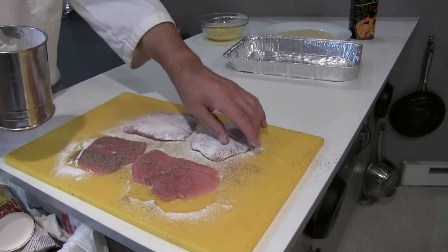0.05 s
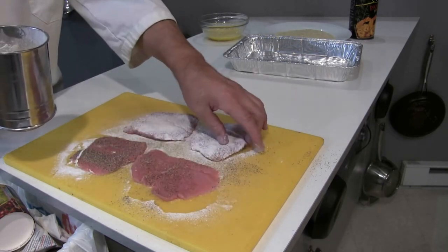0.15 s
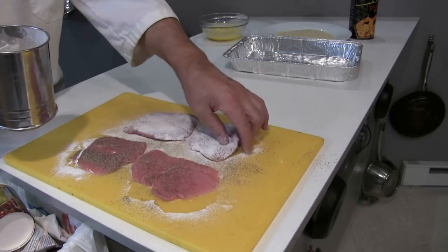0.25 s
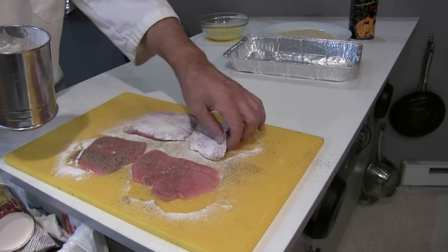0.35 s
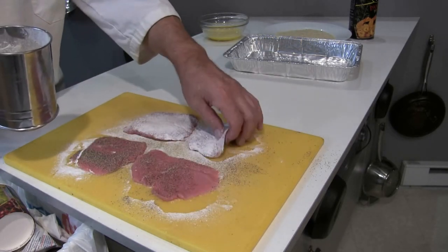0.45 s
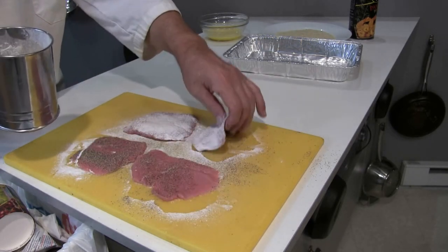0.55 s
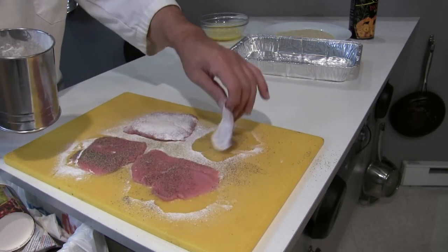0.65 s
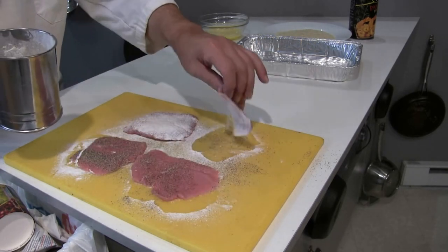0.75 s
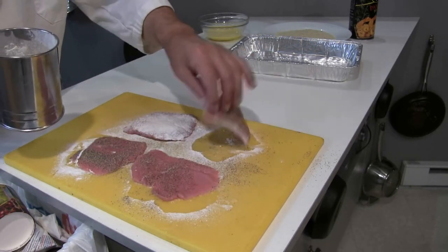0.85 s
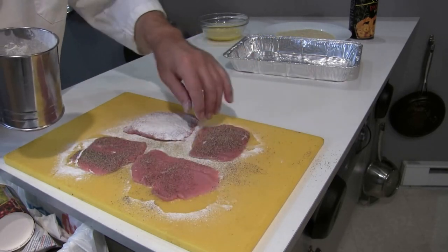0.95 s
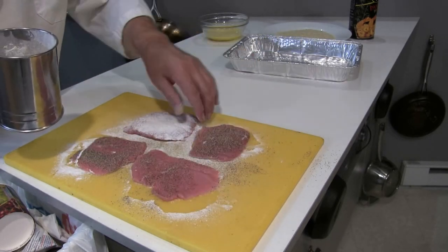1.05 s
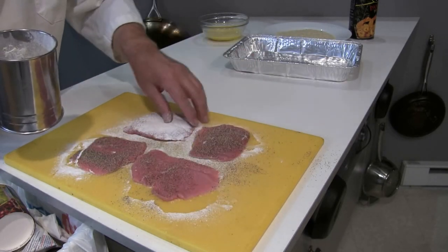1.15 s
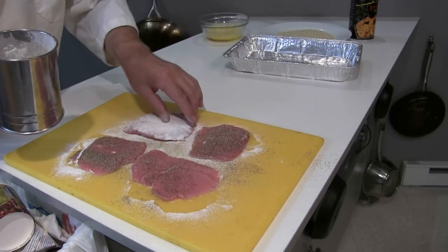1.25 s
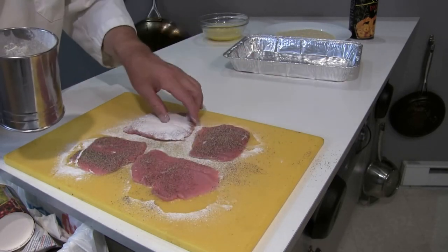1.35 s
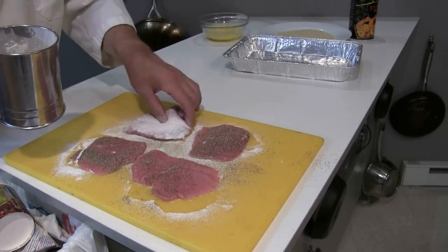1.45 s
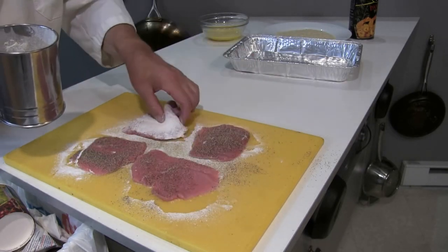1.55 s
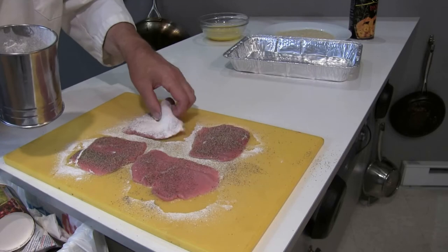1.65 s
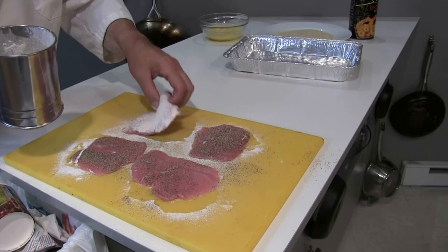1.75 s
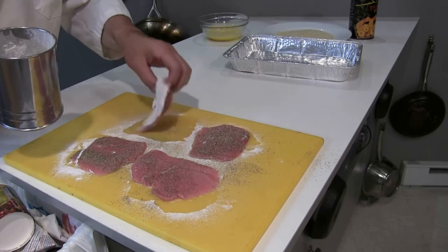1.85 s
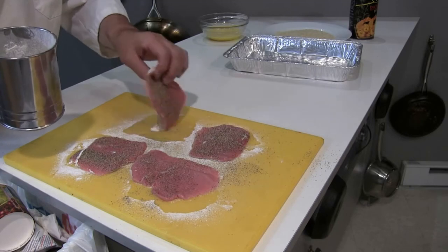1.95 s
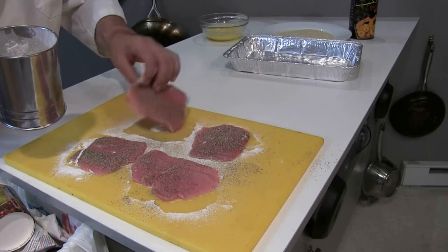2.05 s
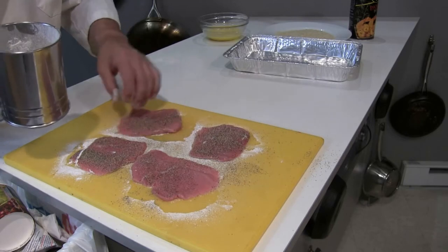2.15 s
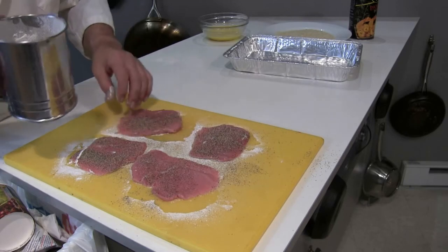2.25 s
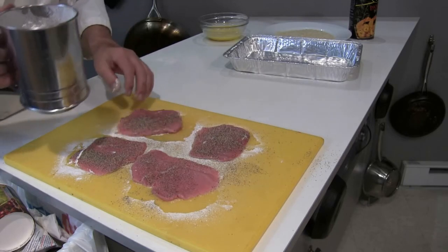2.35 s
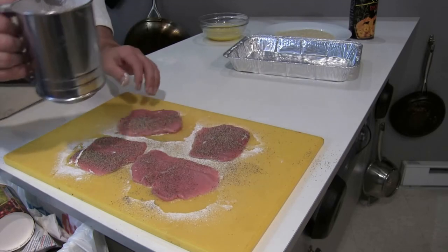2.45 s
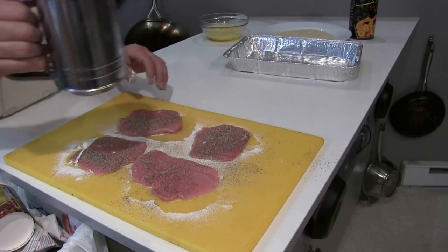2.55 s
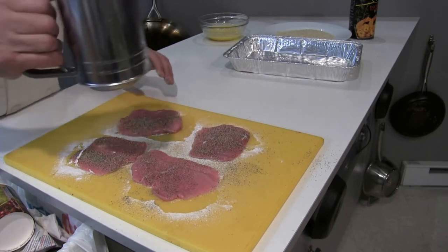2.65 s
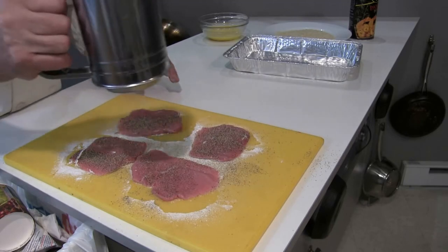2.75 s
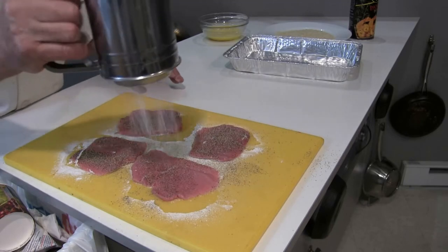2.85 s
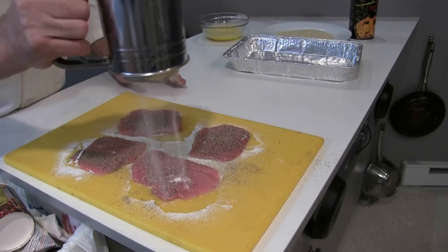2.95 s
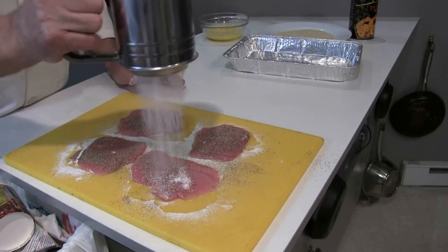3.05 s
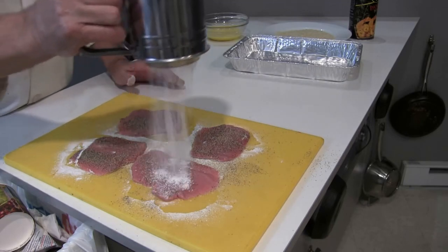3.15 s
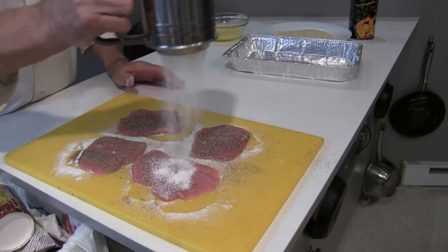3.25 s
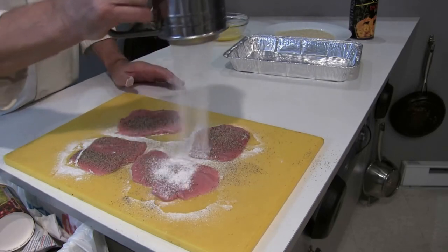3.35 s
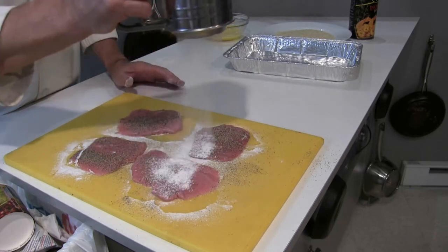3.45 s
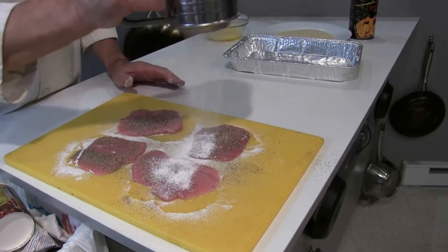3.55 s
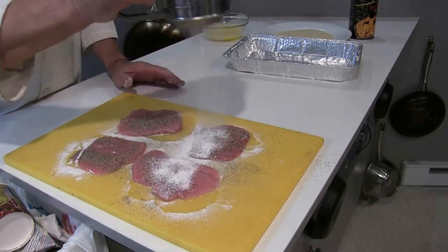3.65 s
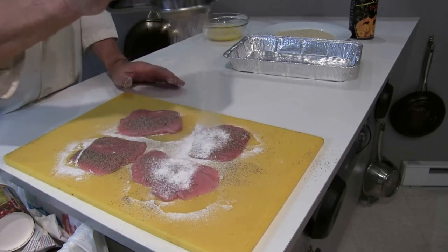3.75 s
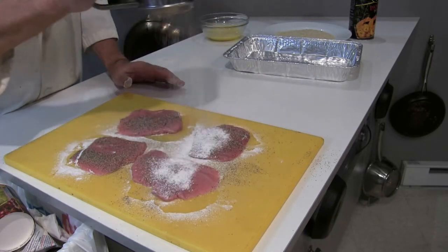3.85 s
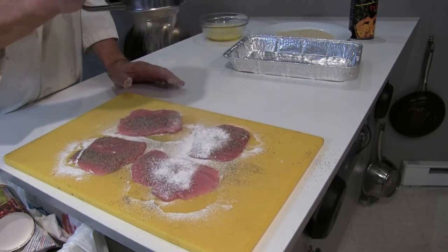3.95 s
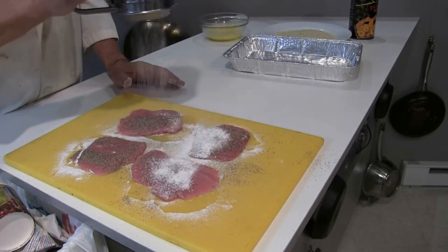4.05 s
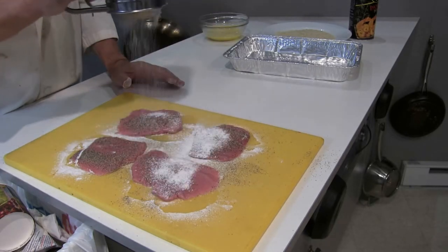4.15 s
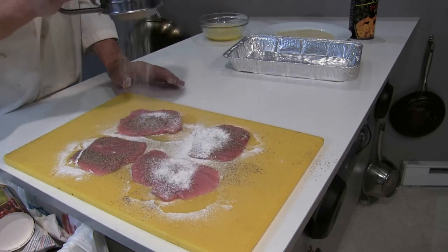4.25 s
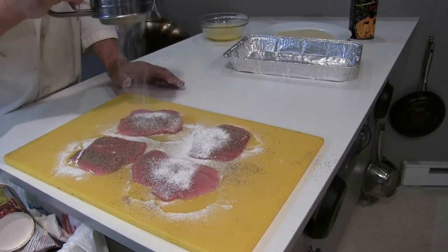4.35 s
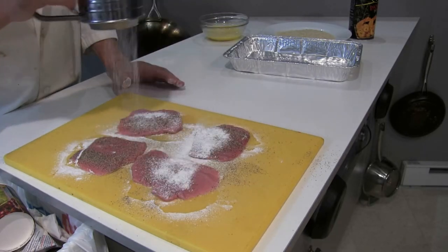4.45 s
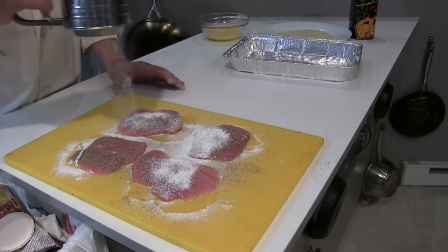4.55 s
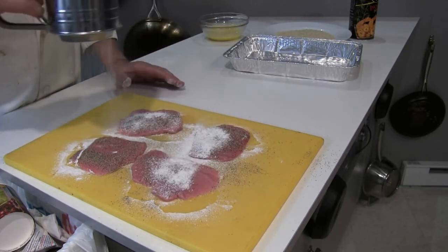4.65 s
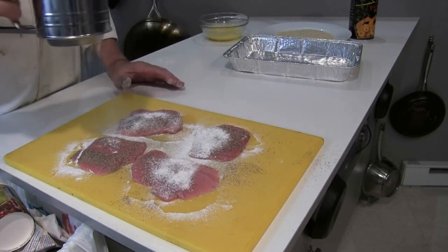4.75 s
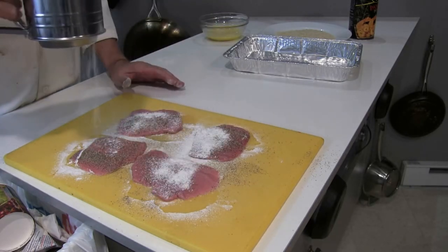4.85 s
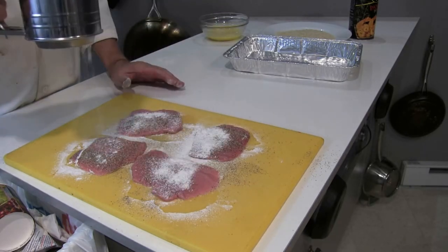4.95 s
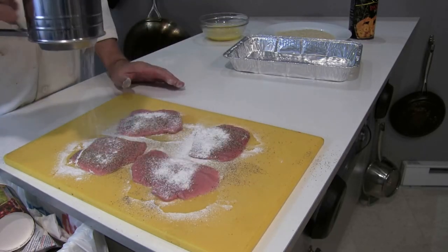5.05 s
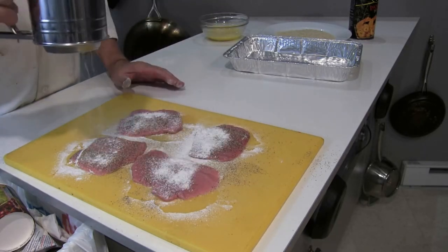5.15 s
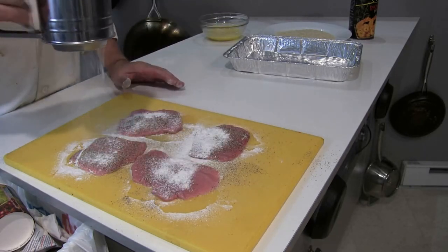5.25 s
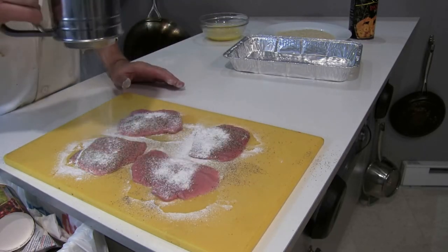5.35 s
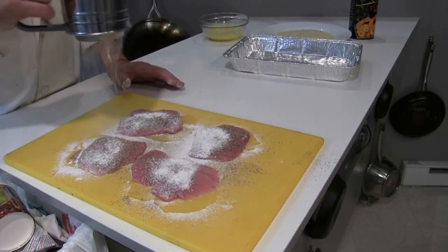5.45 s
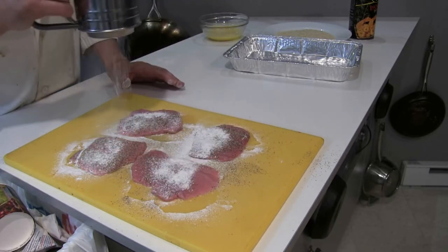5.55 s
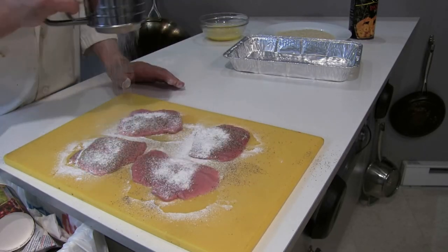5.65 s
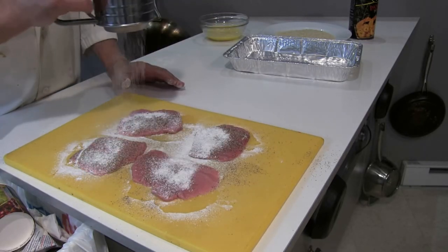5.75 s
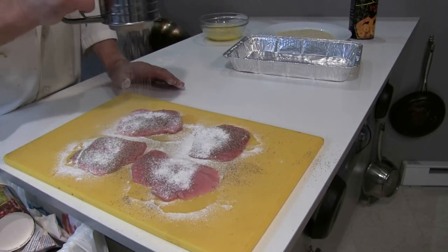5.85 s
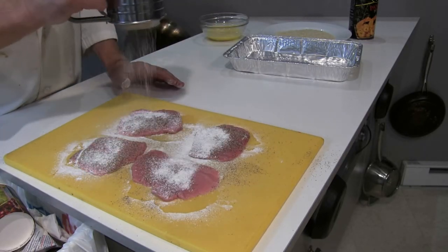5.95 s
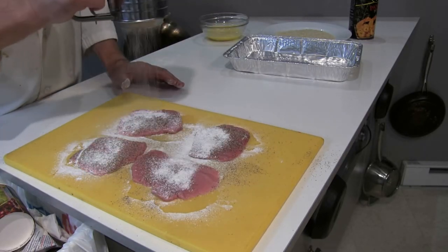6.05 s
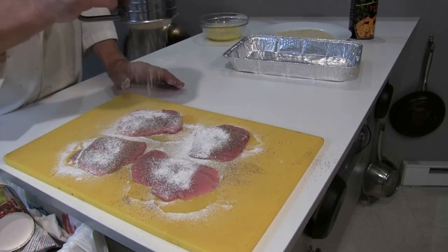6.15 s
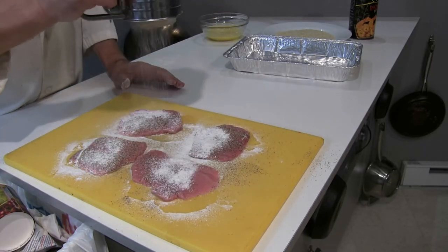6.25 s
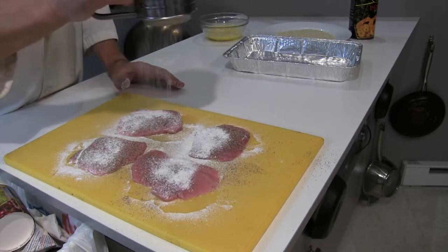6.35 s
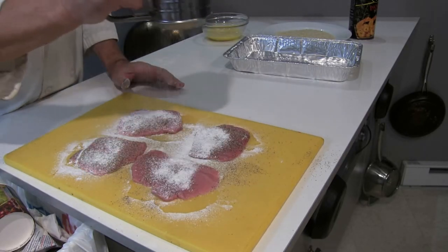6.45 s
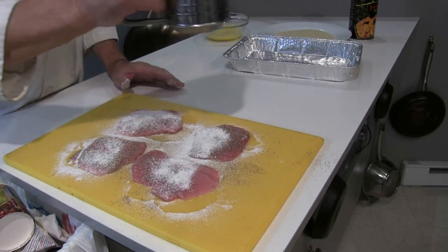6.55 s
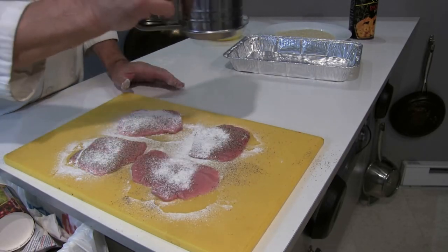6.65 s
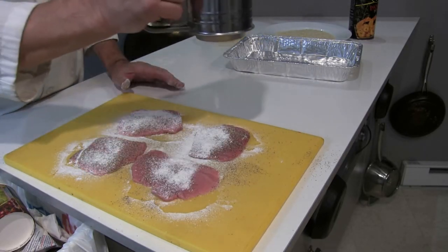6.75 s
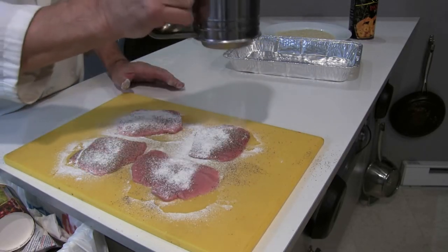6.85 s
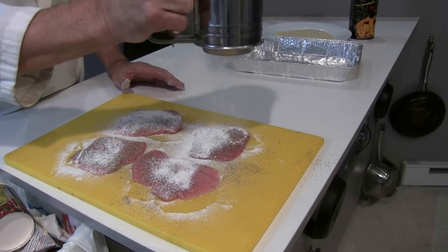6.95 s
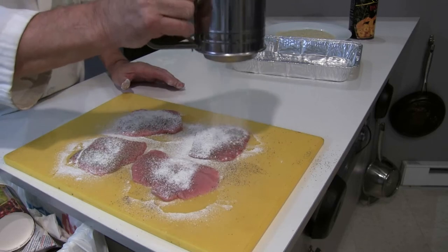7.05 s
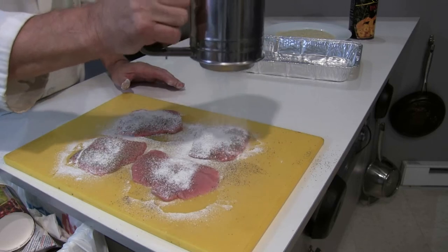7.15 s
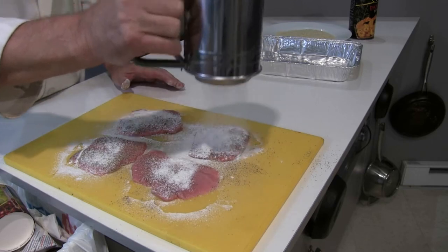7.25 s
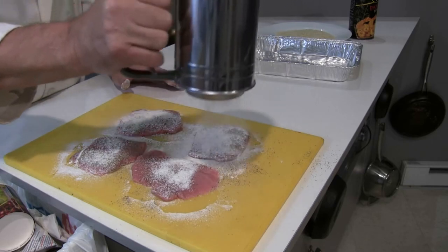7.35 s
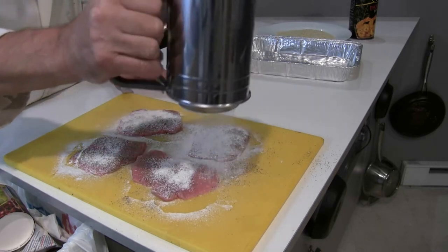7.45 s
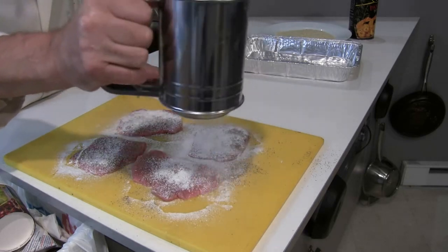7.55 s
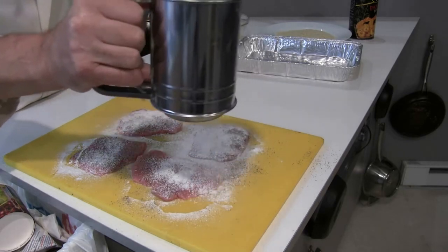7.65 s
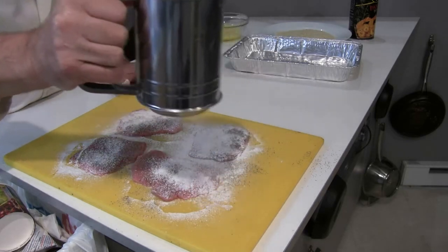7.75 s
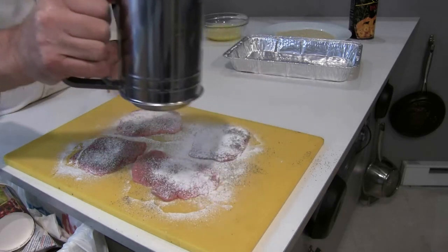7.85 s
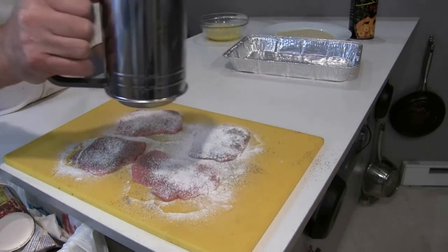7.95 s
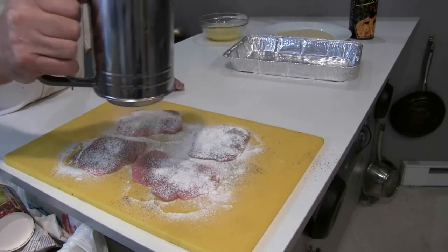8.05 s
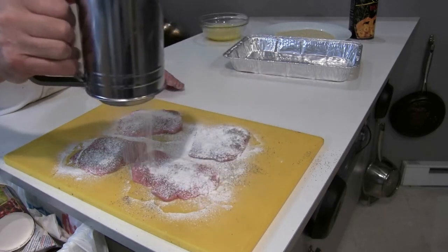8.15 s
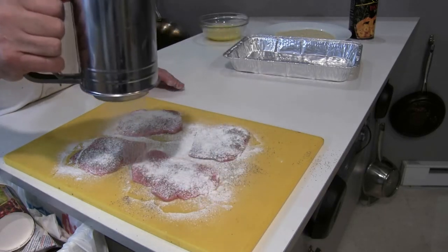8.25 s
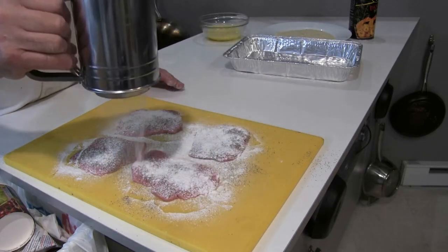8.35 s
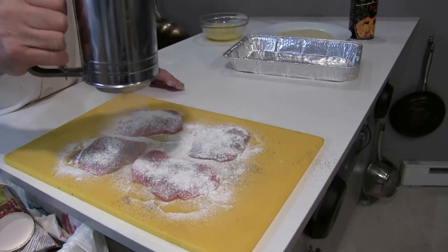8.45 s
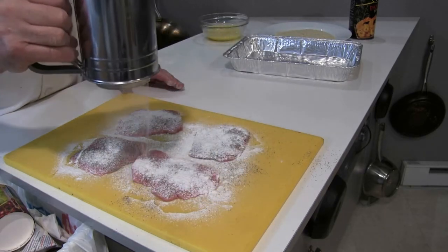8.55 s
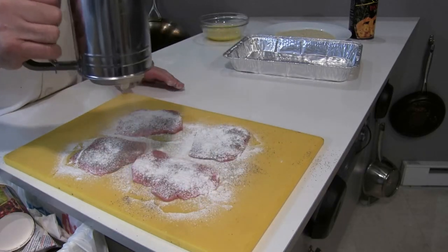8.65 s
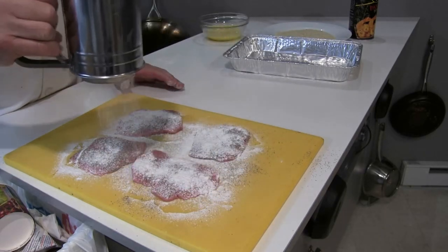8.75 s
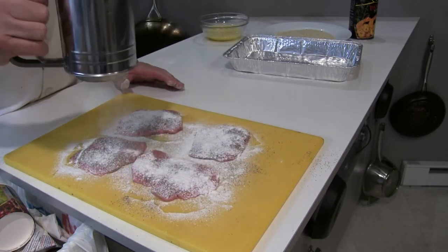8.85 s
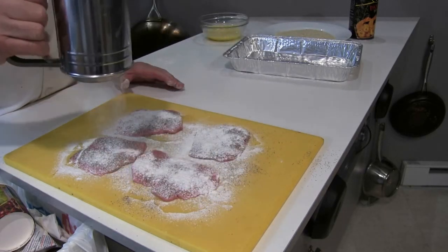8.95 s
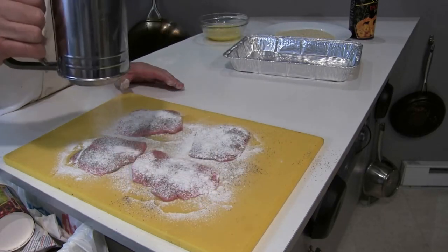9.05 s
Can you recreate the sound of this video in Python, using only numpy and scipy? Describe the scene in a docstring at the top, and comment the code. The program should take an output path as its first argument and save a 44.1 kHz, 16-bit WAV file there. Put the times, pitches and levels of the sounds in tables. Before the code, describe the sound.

Meat cutlets are flipped with muffled pats and a crisp slap, then a squeeze-handle steel sifter clatters and scrapes steadily to the end.

```python
"""Soft slaps over a faint hum come first: cutlets are turned on a floured plastic board, with peeling smacks and a rub.
Then a steel trigger sifter works over them, about 4.5 squeezes a second: nearly every one opens with a tick,
its blades scrape the mesh and it clacks on the stop; the spring throws the trigger back with a second clack.
Slaps, peels, scrape and clacks are noise bursts through resonant filters; the rub and the hum are sines.
A small, hard kitchen adds a short random echo to each event."""
import sys
import numpy as np
from scipy import signal
from scipy.fft import rfft, irfft, next_fast_len
from scipy.io import wavfile
from scipy.ndimage import uniform_filter1d, map_coordinates

SR = 44100
rng = np.random.default_rng(int(sys.argv[2]) if len(sys.argv) > 2 else 0)


def transcribe(u):
    """Save the signal u as a 16-bit wav file named by the first command-line argument.

    u: samples, shape (n,) or (channels, n), limited to [-1, 1]; the rate is SR.
    q: integer samples, one column per channel.
    """
    v = np.clip(np.atleast_2d(u).T, -1, 1)
    q = np.round(v * 32767).astype(np.int16)
    wavfile.write(sys.argv[1], SR, q)


N = 400869

# appliance hum partials: [f/Hz, mean level/dB]
HUM = [(59.2, -70.5), (87, -75), (118.6, -63.5), (231.5, -70), (711, -75), (1420, -80), (4791, -81),
       (6455, -83)]
# colour of the room air: [f/Hz, relative level per Hz/dB]
AIR = [(25, -16), (45, -13), (85, -6), (125, 9.5), (180, 4), (240, 3.5), (400, -0.5), (800, -4.5),
       (1900, -7), (6500, -14), (16000, -24.5)]
# stereo width of the room air: [f/Hz, side against mid/dB]
AIR_WIDTH = [(60, -9), (160, -7), (400, -4.5), (1000, -3), (12000, -1.5)]
# meat and fingers meet the board: [t/s, relative thud level/dB, thud f/Hz, relative smack level/dB, smack f/Hz,
# dry flour brightness/dB, rise/s, t60/s]
PATS = [(0.152, -60, 200, -52.5, 1500, 12, 0.029, 0.16), (0.278, -37, 157, -43.5, 650, -11, 0.018, 0.19),
        (0.417, -51, 233, -43, 1410, 2, 0.024, 0.16), (1.049, -33.5, 151, -46, 560, -27, 0.0025, 0.15),
        (1.321, -63, 200, -52.5, 1500, 13, 0.043, .11), (1.561, -49, 300, -46.5, 1900, -6, 0.031, 0.11),
        (1.615, -46.5, 125, -60, 900, -8, 0.01, 0.087), (1.652, -37.5, 234, -39, 1320, -11, 0.016, 0.099),
        (1.75, -45, 322, -52, 850, 0, 0.025, 0.21), (2.238, -39.5, 242, -41.5, 1200, -13, 0.012, 0.084),
        (2.287, -53, 130, -59, 1000, -8, 0.009, 0.15)]
# board under a thud: [f/Hz, relative level per Hz/dB]
THUD_COLOUR = [(60, -25), (110, -2), (150, 7.5), (200, 2), (300, 7), (430, 1), (600, 1.5), (900, -6),
               (2000, -43.5)]
# wet or floury surface under a smack: [f/Hz, relative level per Hz/dB]
SMACK_COLOUR = [(250, -35), (700, -10), (1100, -6), (1700, -2.5), (3000, -3.5), (6000, -10.5), (10000, -21),
                (16000, -31)]
# sticky skin peels off the board: [t/s, relative level/dB]
PEELS = [(0.245, -42), (0.259, -35), (0.398, -44), (0.421, -45), (1.6425, -45), (1.719, -46)]
# a damp cutlet drags on the board: [t/s, mean slip rate f/Hz, relative level/dB]
DRAG = [(1.465, 335, -66), (1.48, 335, -49), (1.505, 305, -41), (1.53, 320, -44), (1.548, 320, -50),
        (1.565, 320, -38.5), (1.588, 310, -52), (1.612, 235, -46), (1.66, 245, -39), (1.7, 260, -52),
        (1.715, 340, -64), (1.75, 395, -46), (1.8, 380, -47), (1.83, 380, -70)]
# the trigger is pressed home: [t/s, relative level/dB, share of the first snap/0-1, ping f/Hz, ping lift/dB,
# body lift/dB, rim lift/dB, treble lift/dB]
PRESSES = [(2.736, -29.5, 1, 7960, 13, -12, -11, -3), (2.934, -27, 0.14, 3140, 10, 0, -3, -2),
           (3.179, -25.5, 0.32, 7000, 13, -0.5, -2, -7), (3.409, -28, 0.34, 5100, 7, 0, -4, -3),
           (3.65, -29.5, 1, 3600, 7, 2.5, 2.5, 6), (3.886, -30, 0.3, 1990, 6, -2.5, -2, 1.5),
           (4.11, -34.5, 1, 2240, 12, 3, -1, -4), (4.311, -30, 0.73, 2060, 5, 0.5, -4, 0),
           (4.506, -30, 0.73, 3430, 7.5, 1.5, -2, -1), (4.729, -30, 0.98, 3440, 9, -3, -2, 3.5),
           (4.949, -31, 0.45, 2230, 5, -7, 1, 0), (5.157, -29, 0.64, 5120, 0, 3, 1, -3),
           (5.361, -30, 0.3, 3770, 3, 1.5, -6, -1), (5.588, -30, 0.24, 3340, -5, -2.5, -0.5, 1.5),
           (5.804, -28, 0.68, 1840, 9, -2, -1, 1.5), (6.018, -27, 0.7, 1790, 7, -2, -1.5, -2),
           (6.216, -25, 0.44, 4210, 3, -2.5, 0, -0.5), (6.429, -28, 1, 1990, 7, -4, -4, -2),
           (6.653, -26.5, 0.95, 4070, 6, 3, -1, 1.5), (6.874, -29, 0, 2360, 4, 2, 0, 1),
           (7.101, -29, 0.03, 2480, 8, 6, 0.5, -1), (7.318, -28.5, 0.2, 2240, 8, -0.5, -2, -1),
           (7.545, -23.5, 0.84, 3600, 1, 1, 1, 1), (7.763, -29, 1, 6080, 2, 0, -6, 2.5),
           (7.973, -26, 0.68, 5660, 2, -4, -1, -1), (8.203, -30, 0.43, 3970, 11, -2, -9, 1.5),
           (8.424, -26.5, 0.74, 4520, 8, -2.5, 0.5, 0), (8.641, -30.5, 1, 1740, 9, 1.5, -3, -2),
           (8.852, -26, 0.5, 5730, 5, 0.5, -3.5, -3), (9.063, -27.5, 0.2, 4540, 8, -1.5, -4, -6)]
# the spring throws the trigger back: [t/s, relative level/dB, share of the first snap/0-1, ping f/Hz, ping lift/dB,
# body lift/dB, rim lift/dB, treble lift/dB]
RELEASES = [(2.744, -28, 0.82, 3060, 7, 2.5, 1.5, 1.5), (3.01, -24.5, 0.34, 5950, 9, 0, 4.5, -1),
            (3.248, -26, 0.57, 6810, 3, 0, -1.5, 1), (3.476, -25.5, 0.98, 3630, 0, 0, -3.5, -1.5),
            (3.714, -30.5, 0.36, 6840, 9, 3, -2, 0.5), (3.941, -32.5, 0.22, 8740, 13, 2, -3, 5.5),
            (4.154, -29, 0.9, 4110, 1, -1, -6.5, 6), (4.356, -29, 0.3, 7130, 5, 0, -0.5, 7),
            (4.577, -35, 0.64, 2370, 11, 1, -8, 9.5), (4.789, -31, 0.3, 3620, 6, -0.5, -4, 5),
            (5.002, -27.5, 0.15, 2520, 11, 2.5, 1.5, 4.5), (5.214, -29.5, 0.6, 2350, -2, 5.5, 2.5, 2.5),
            (5.43, -27.5, 0.47, 3870, -2, -4.5, -2, 3), (5.651, -30, 0.1, 3620, 4, 0, -1.5, 4),
            (5.87, -27.5, 0.97, 7940, 1, -0.5, -4, 1), (6.075, -27, 0.94, 2160, 5, 1.5, -0.5, 0.5),
            (6.282, -29.5, 0.97, 5700, 4, -1.5, -1, 3.5), (6.497, -28.5, 0.44, 2330, 10.5, 4, -2, 2),
            (6.731, -24.5, 0.93, 2580, -3.5, 1.5, -1, 2), (6.953, -23, 0.51, 3670, 4, 0.5, -1, 1.5),
            (7.162, -26, 0.95, 5760, 3, 1, 0, 6.5), (7.385, -24, 0.95, 5730, 1, 1, -1.5, 4.5),
            (7.607, -25.5, 0.94, 6820, 10.5, 3, -1, 2), (7.81, -28, 0.92, 7350, 2, 3, -1, 7.5),
            (8.044, -23.5, 0.88, 6700, 7.5, 2.5, -3.5, 1), (8.267, -28, 0.6, 6870, 9, 0.5, -3, -1.5),
            (8.49, -26.5, 0.93, 6600, 5.5, 4, -3, -0.5), (8.697, -27, 0.68, 3250, 7, 2, -1, 2.5),
            (8.908, -24, 0.25, 6660, 10, 0, -2.5, -0.5)]
# extra clacks and rebounds, during the strokes and just after the stops: [t/s, relative level/dB, share of the
# first snap/0-1]
EXTRA_CLACKS = [(2.772, -33, 0.4), (2.79, -36, .4), (2.968, -29, 0.54), (3.034, -28.5, 0.4),
                (3.207, -32, 0.6), (3.435, -31, 0.9), (3.622, -31, 0.2), (3.747, -36, 0.3),
                (4.585, -33, 0.95), (6.412, -39, 0.5), (6.642, -37, 0.9), (6.905, -28, 0.74),
                (7.133, -38, 0.87), (7.169, -25.5, 0.7), (7.352, -31, 1), (8.038, -32, .9),
                (8.221, -32.5, 0.45), (8.668, -57, 0.9), (8.69, -29, 0.14)]
# colour of one steel contact: [f/Hz, relative level per Hz/dB]
CLACK_COLOUR = [(60, -27.5), (130, -16.5), (250, -12.5), (500, -3.5), (800, 1), (1080, -3), (2000, -1),
                (3200, -2.5), (6000, -4.5), (8300, -9), (11000, -12.5), (15000, -20.5), (16000, -44)]
# mean resonances of the steel can and spring: [f/Hz, width/Hz, lift/dB]
CAN = [(232.8, 12, 9), (379, 15.5, 4), (404, 23, 4), (509.6, 20, 3), (718.6, 23, 4.5), (773.5, 22, 6),
       (841, 36, 7), (953, 31, 2), (1355, 28, 1.5), (1386, 440, 5), (1664, 42, 1), (2510, 640, 1),
       (3630, 400, 3), (5660, 140, 1), (9260, 390, 0.5)]
# the linkage takes up its slack and the stroke begins: [t/s, relative level/dB]
TICKS = [(2.891, -45.5), (3.15, -38.5), (3.392, -42), (3.586, -45), (3.836, -49), (4.06, -54), (4.264, -45),
         (4.461, -44.5), (4.689, -43), (4.903, -44), (5.11, -47), (5.318, -45), (5.546, -46), (5.761, -46),
         (5.973, -45), (6.171, -46), (6.391, -46), (6.611, -41), (6.837, -42.5), (7.058, -43.5),
         (7.277, -43), (7.497, -44), (7.716, -42.5), (7.923, -42), (8.155, -44), (8.377, -40.5),
         (8.597, -52), (8.802, -47), (9.023, -46)]
# blades on the mesh over time: [t/s, relative level/dB]
SCRAPE = [(2.85, -49), (2.92, -35), (3.11, -31), (4.03, -36), (4.38, -36.5), (6.1, -32), (7.11, -33.5),
          (7.44, -33), (9.09, -32)]
# colour of the mesh: [f/Hz, relative level per Hz/dB]
MESH_COLOUR = [(100, -33), (300, 1.5), (800, -5), (1100, 0.5), (2500, -0.5), (6500, -0.5), (10000, -5.5),
               (15000, -12.5)]
# where the sifter is held: [t/s, left against right/dB]
PAN = [(2.7, 0.5), (3.27, -0.5), (4.17, -0.5), (4.83, 0.5), (7.01, -1), (9.09, 0.5)]
# the sifter comes nearer or moves off: [t/s, direct level of press and release clacks/dB]
DIRECT = [(2.7, -5.5), (5, -0.5), (6.9, -5), (7.6, 0), (8.1, -0.5), (9, -2.5)]
# full-length decay of the kitchen: [f/Hz, t60/s]
KITCHEN = [(150, 0.17), (800, 0.41), (3000, 0.3), (7000, 0.33), (14000, 0.29)]
# lift of the first strong echo over the others: [f/Hz, added gain]
CEILING = [(200, 1.8), (780, 0.98), (1200, 0.35), (10000, 0.31)]
# stereo width of the echoes: [f/Hz, side against mid/dB]
ECHO_WIDTH = [(130, -13), (260, -10.5), (500, -9.8), (1500, -7.8), (7000, -8), (13000, -4.8)]

SIZE = 16384  # samples in a filter design
HZ = np.fft.rfftfreq(SIZE, 1 / SR)
TIME = np.arange(N) / SR
TOP_HZ = 15900  # upper band limit
CEILING_S = 0.013  # delay of the first strong echo
HUM_WAVER_DB = 1.6
SLAP_S, SLAP_DB = 1.045, -20.5  # a cutlet lands flat, with a crisp edge
DRAG_ROUGH = 0.025  # unevenness of the slip rate, as a fraction
CAN_DETUNE, CAN_SCATTER_DB = 0.012, 1.2  # grip and flour shift each resonance a little from blow to blow
GRAZE_S, GRAZE_RISE_S = 0.012, 0.0016  # a blade's graze before it lands: lead, swelling time
PING_WIDTH = 0.2  # a ping is brief: its bandwidth over its pitch
PING_SCATTER_OCTAVES = 0.25  # each tick of the linkage pings at a new pitch
SECOND_TICK_S, SECOND_TICK_DB = 0.022, -49.5  # the blades break loose just after the tick: delay, relative level
SWEEP_S = 0.035  # how long the blades run fast on either side of a stop
SPIN_UP_S = 0.01  # the blades gather speed after the tick
RASPS_PER_S, RASP_DB = 70, 9  # a blade snags on a mesh wire: mean rate, mean kick over the grating
RASP_S = 0.0012  # decay time of one snag


def amp(db):
    """Decibels to gain."""
    return 10 ** (np.asarray(db) / 20)


def unit(x):
    """Scale to rms 1."""
    return x / np.sqrt(np.mean(x ** 2) + 1e-20)


def blow(x):
    """Scale to energy 1."""
    return x / (np.linalg.norm(x) + 1e-12)


def along(points, hz):
    """Read (Hz, value) points on a log frequency axis."""
    f, v = np.transpose(points)
    return np.interp(np.log(hz + 1), np.log(f), v)


def wobble(rate, count=N):
    """A smooth random curve, rate knots a second."""
    knots = rng.standard_normal(int(count * rate / SR) + 4)
    return map_coordinates(knots, [np.arange(count) * rate / SR], order=2)


def filtered(x, gain):
    """Shape x by a gain that depends on frequency."""
    count = x.shape[-1]
    m = next_fast_len(count + 8192)
    return irfft(rfft(x, m) * gain(np.fft.rfftfreq(m, 1 / SR)), m)[..., :count]


def ring(db):
    """Causal (minimum-phase) impulse response with the given gain on HZ."""
    cepstrum = irfft(np.log(amp(db)))
    cepstrum[1:SIZE // 2] *= 2
    cepstrum[SIZE // 2 + 1:] = 0
    return irfft(np.exp(rfft(cepstrum)))[:SIZE // 4]


def bump(hz, width):
    """A resonance curve of height 1 on HZ."""
    return 1 / (1 + (2 * (HZ - hz) / width) ** 2)


def grains(count, rate):
    """Tiny random contacts, rate a second, with rms 1."""
    return unit(rng.standard_normal(count) * (rng.random(count) < rate / SR))


def even(x, size=12):
    """Flatten the broad colour of a burst of contacts and keep its timing."""
    z = rfft(x)
    power = uniform_filter1d(abs(z) ** 2, size)
    return irfft(z / np.sqrt(abs(power) + 1e-12), len(x))


def add(track, s, sound):
    """Mix a stereo sound into the track at time s."""
    start = max(round(s * SR), 0)
    part = track[:, start:start + sound.shape[1]]
    part += sound[:, :part.shape[1]]


def spread(pair, width):
    """Two unrelated signals become mid and side of a diffuse stereo field."""
    side = filtered(pair[1], lambda hz: amp(along(width, hz)))
    return np.array([pair[0] + side, pair[0] - side])


def panned(x, db):
    """Left louder than right by db."""
    return x * amp(np.array([[0.5], [-0.5]]) * db)


def in_kitchen(x, wet_db, length=1, build=0.00053, direct_db=0):
    """Direct sound, then worktop and walls: decaying noise, drawn afresh for each sound."""
    hz, t, z = signal.stft(rng.standard_normal((2, SR // 3)), SR, nperseg=256)
    first_echo = along(CEILING, hz)[:, None] * np.exp(-((t - CEILING_S) / 0.0037) ** 2)
    decay = amp(-60 * t / (length * along(KITCHEN, hz))[:, None])
    tail = signal.istft(z * (1 + first_echo) * decay, SR, nperseg=256)[1]
    tail *= 1 - np.exp(-(np.arange(tail.shape[1]) / SR / build) ** 2)
    tail = np.array([blow(even(part, size=36)[:3 * SR // 10]) for part in tail])
    echo = amp(wet_db) * spread(tail, ECHO_WIDTH)
    echo[:, 0] += amp(direct_db)  # the direct sound
    return signal.fftconvolve(x[None], echo, axes=1)


def background(air_db=-53.5):
    """Room air is coloured noise; the appliance hum is sines that waver in level and phase."""
    noise = filtered(rng.standard_normal((2, N)), lambda hz: amp(along(AIR, hz)))
    air = unit(spread(noise, AIR_WIDTH))
    hum = 0
    for hz, db in HUM:
        level = np.sqrt(2) * amp(db + HUM_WAVER_DB * wobble(rate=4.1))
        hum = hum + level * np.sin(2 * np.pi * hz * TIME + 0.5 * wobble(rate=17))
    return amp(air_db) * air + hum


def cutlets(lead=0.093, boom_db=8, boom_width=0.16, cup_db=7, cup_width=1.0):
    """Soft meat presses onto the board: low thuds, surface smacks coloured by dry flour, one flat slap."""
    out, t = np.zeros((2, N)), np.arange(SR // 3) / SR - lead
    floury = along([(1500, 0.066), (4500, 0.9)], HZ)
    for s, thud_db, thud_hz, smack_db, smack_hz, bright_db, rise, t60 in PATS:
        press = np.where(t < 0, np.exp(-abs(t) / rise), amp(-60 * abs(t) / t60))
        # each spot of the board booms at its own pitch
        board = ring(along(THUD_COLOUR, HZ) + boom_db * bump(thud_hz, boom_width * thud_hz))
        thud = signal.fftconvolve(even(press * grains(len(t), rate=6000), size=24), board)
        cup = cup_db * bump(smack_hz, cup_width * smack_hz)
        surface = ring(along(SMACK_COLOUR, HZ) + bright_db * floury + cup)
        smack = signal.fftconvolve(press * grains(len(t), rate=2600), surface)
        # a longer press carries more energy
        sound = np.linalg.norm(press) * (amp(thud_db) * blow(thud) + amp(smack_db) * blow(smack))
        add(out, s - lead, in_kitchen(sound, wet_db=-2.0))
    slap = amp(SLAP_DB) * blow(ring(along(SMACK_COLOUR, HZ)))
    add(out, SLAP_S, in_kitchen(slap, wet_db=0))
    return out


def peels(gain_db=15, t60=0.015, bright_db=9):
    """Sticky skin lets go of the board in crisp crackles: short decaying bursts of tiny contacts."""
    out, t = np.zeros((2, N)), np.arange(SR // 30) / SR
    skin = ring(along(SMACK_COLOUR, HZ) + bright_db * along([(1500, 0.19), (4500, 0.81)], HZ))
    for s, db in PEELS:
        burst = even(grains(len(t), rate=3100) * amp(-60 * t / t60))
        crackle = signal.fftconvolve(burst, skin)
        add(out, s, in_kitchen(amp(db + gain_db) * blow(crackle), wet_db=-4))
    return out


def drag(unsteady_db=3, gain_db=-2.5):
    """Stick and slip on the plastic make a short, low, uneven rubbing tone."""
    s, hz, db = np.transpose(DRAG)
    t = np.arange(s[0], s[-1], 1 / SR)
    slip_hz = np.interp(t, s, hz) * (1 + DRAG_ROUGH * wobble(rate=130, count=len(t)))
    phase = 2 * np.pi * np.cumsum(slip_hz) / SR
    slips = np.sin(phase) + amp(-14) * np.sin(phase / 2) + amp(-24) * np.sin(3 * phase)
    grip_db = np.interp(t, s, db) + gain_db + unsteady_db * wobble(rate=130, count=len(t))
    out = np.zeros((2, N))
    add(out, s[0], in_kitchen(amp(grip_db) * slips, wet_db=-7))
    return out


def can_db():
    """The resonances of the can for one blow, slightly scattered, in dB on HZ."""
    total = 0
    for hz, width, db in CAN:
        lift = db + CAN_SCATTER_DB * rng.standard_normal()
        total = total + lift * bump(hz * (1 + CAN_DETUNE * rng.standard_normal()), width)
    return total


def spot():
    """The blades touch a new spot each time, which favours other modes: a random curve on HZ."""
    return np.interp(np.sqrt(HZ / HZ[-1]), np.linspace(0, 1, num=120), rng.standard_normal(120))


def contacts(share, ping_hz, ping_db, lead, soft_rise=0.0041, chatter_time=0.0069, chatter_rate=3400,
             graze_db=-15, snap_t60=0.01):
    """A blade grazes its stop and snaps home with a short ping; the remaining energy is chatter."""
    t = np.arange(SR // 14) / SR - lead
    after = np.maximum(t, 0)
    graze = blow(grains(len(t), rate=3900) * (t < 0) * np.exp(-abs(t) / GRAZE_RISE_S))
    # a square hit snaps at once, a glancing one takes longer
    rise = soft_rise * (1 - share) ** 3 + 1 / SR
    envelope = amp(-60 * after / snap_t60) * (1 - np.exp(-after / rise))
    snap = even(rng.standard_normal(len(t)) * envelope) * (t >= 0)
    ping = ring(ping_db * bump(ping_hz, PING_WIDTH * ping_hz) + along([(6000, 0.5), (14000, 3)], HZ))
    snap = blow(signal.fftconvolve(snap, ping)[:len(t)])
    # the chatter comes in small rebounds, a few ms apart
    rebounds = amp(3.5 * wobble(rate=420, count=len(t)))
    chatter = grains(len(t), chatter_rate) * rebounds * after * np.exp(-after / chatter_time)
    chatter = blow(even(chatter, size=16))
    return np.sqrt(share) * (snap + amp(graze_db) * graze) + np.sqrt(1 - share) * chatter


def clack(db, snap, ping_hz, ping_db, body_db, rim_db, treble_db, spot_db=1.0, gain_db=29):
    """One steel contact rings the can; it begins GRAZE_S before the blow."""
    body = along([(420, 0), (700, 1), (870, 1), (1080, 0)], HZ)
    rim = along([(950, 0), (1200, 1), (1600, 1), (2200, 0)], HZ)
    treble = along([(4500, 0), (9500, 1)], HZ)
    strike = contacts(np.clip(snap, 0, 1), ping_hz, ping_db, GRAZE_S)
    can = ring(along(CLACK_COLOUR, HZ) + can_db() + spot_db * spot())
    hit = blow(signal.fftconvolve(strike, can))
    tone_db = db + gain_db + body_db * body + rim_db * rim + treble_db * treble
    return irfft(rfft(hit, SIZE) * amp(tone_db))[:len(hit)]


def clacks():
    """The pressed trigger damps the steel, so its echo is short; let go, it lands fuller and rings on."""
    out = np.zeros((2, N))
    near = lambda s: np.interp(s, *np.transpose(DIRECT))
    for s, *row in PRESSES:
        add(out, s - GRAZE_S, in_kitchen(clack(*row), wet_db=1.5, length=0.41, direct_db=near(s)))
    for s, *row in RELEASES:
        add(out, s - GRAZE_S, in_kitchen(clack(*row), wet_db=5.0, length=0.96, direct_db=near(s)))
    for s, db, snap in EXTRA_CLACKS:
        hit = clack(db, snap, ping_hz=2940, ping_db=-1, body_db=-1, rim_db=-2.5, treble_db=2.0)
        add(out, s - GRAZE_S, in_kitchen(hit, wet_db=1.0, length=0.92))
    return out


def ticks(tick_hz=2600):
    """Slack in the linkage closes with a thin double tick: two small clacks with the same ping."""
    out = np.zeros((2, N))
    gap = round(SECOND_TICK_S * SR)
    for s, db in TICKS:
        ping_hz = tick_hz * 2 ** (PING_SCATTER_OCTAVES * rng.standard_normal())
        tone = dict(snap=1.0, ping_hz=ping_hz, ping_db=7.5, body_db=-2.0, rim_db=-4.0, treble_db=5.0)
        first = clack(db, **tone)
        second = clack(SECOND_TICK_DB, **tone)
        both = np.pad(first, (0, gap)) + np.pad(second, (gap, 0))
        add(out, s - GRAZE_S, in_kitchen(both, wet_db=5.0, length=0.57))
    return out


def snags(count):
    """Gain of the grating: single wires snag the blades at uneven moments, each kick dying away."""
    kicks = (rng.random(count) < RASPS_PER_S / SR) * amp(RASP_DB + 2 * rng.standard_normal(count))
    return unit(1 + signal.lfilter([1], [1, -np.exp(-1 / (RASP_S * SR))], kicks))


def scraping(lead=0.0013, swell_db=5.0, gain_db=-11.0, rest_db=-7, can_share=0.94, spot_db=2.5):
    """Wire blades grate over the mesh from each tick on, swell just before a stop and ease after release."""
    out = np.zeros((2, N))
    starts = [s for s, _ in TICKS]
    ends = starts[1:] + [N / SR]
    presses = [row[0] for row in PRESSES[1:]]  # the first squeeze has no tick and no scrape
    releases = [row[0] for row in RELEASES[1:]] + [N / SR]
    for start, end, press, release in zip(starts, ends, presses, releases):
        t = np.arange(start, end, 1 / SR)
        speed = np.max([np.exp(-((t - stop + lead) / SWEEP_S) ** 2) for stop in (press, release)], axis=0)
        resting = np.clip((t - release) / SWEEP_S - 0.5, 0, 1)
        stroke_db = np.interp(t, *np.transpose(SCRAPE))
        level = amp(stroke_db + swell_db * speed + rest_db * resting + gain_db)
        uneven_db = 5 * np.tanh(wobble(rate=180, count=len(t)))
        grit = np.sign(grains(len(t), rate=4500)) * amp(uneven_db) * snags(len(t))
        grit = unit(grit) * (1 - np.exp(-(t - start) / SPIN_UP_S))
        mesh = blow(ring(along(MESH_COLOUR, HZ) + can_share * can_db() + spot_db * spot()))
        add(out, start, in_kitchen(signal.fftconvolve(level * grit, mesh), wet_db=5.5))
    return out


def scene():
    """The sifter wanders over the board; the rest stays a little to the right."""
    board = panned(background() + cutlets() + peels() + drag(), db=-0.8)
    sifter = panned(clacks() + ticks() + scraping(), np.interp(TIME, *np.transpose(PAN)))
    return board + sifter


def record(dry):
    """A steep low-pass keeps nothing above TOP_HZ."""
    return filtered(dry, lambda hz: hz < TOP_HZ)


dry = scene()
out = record(dry)
transcribe(out)
```